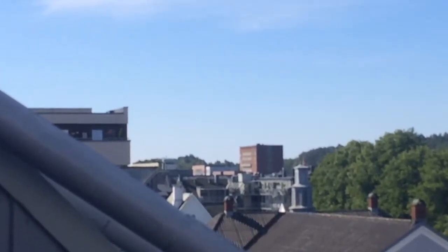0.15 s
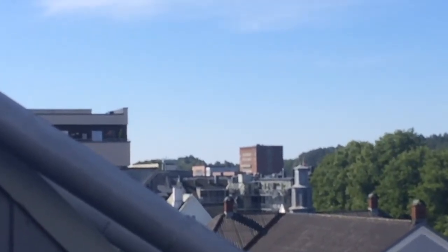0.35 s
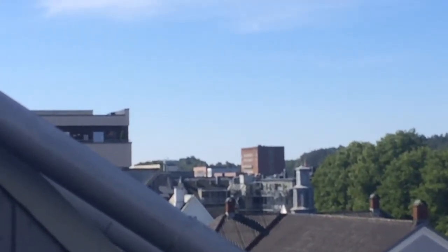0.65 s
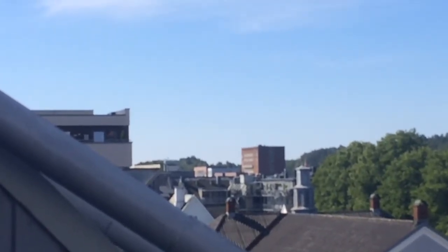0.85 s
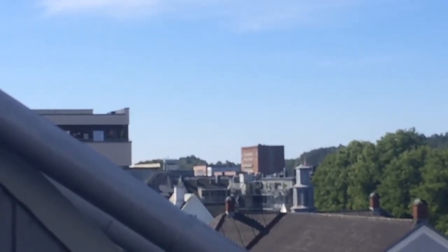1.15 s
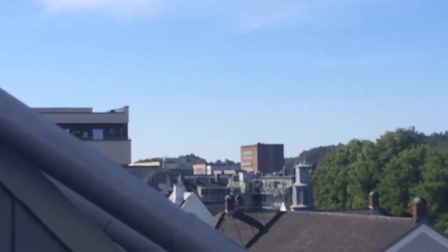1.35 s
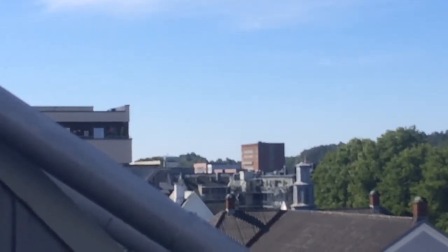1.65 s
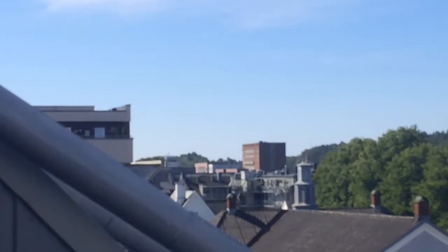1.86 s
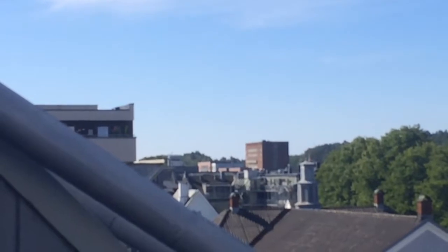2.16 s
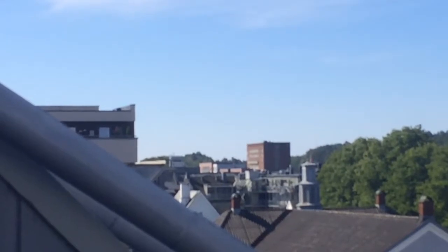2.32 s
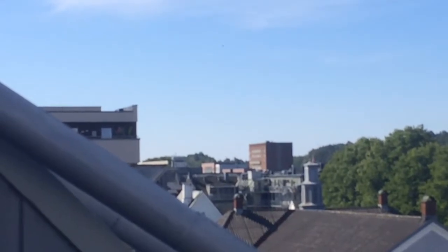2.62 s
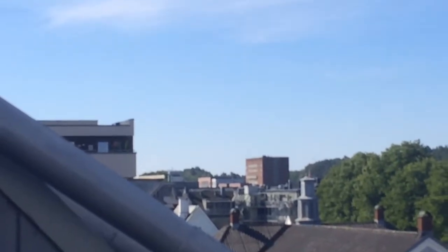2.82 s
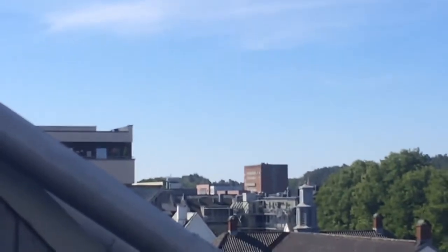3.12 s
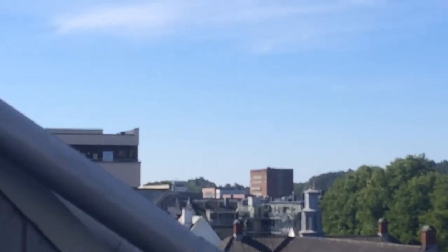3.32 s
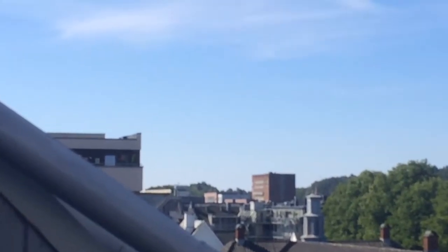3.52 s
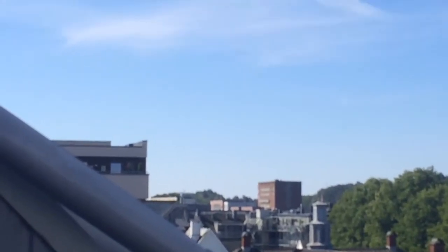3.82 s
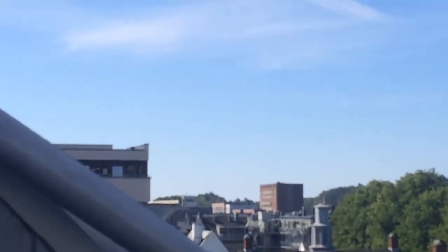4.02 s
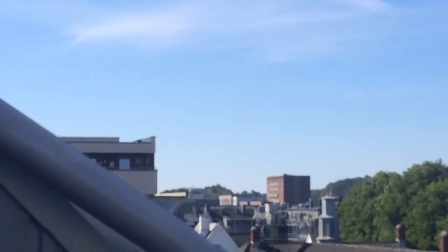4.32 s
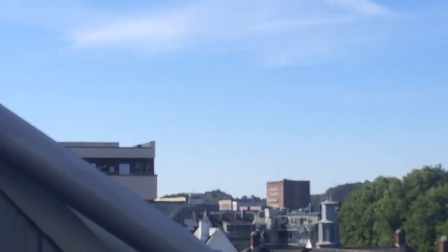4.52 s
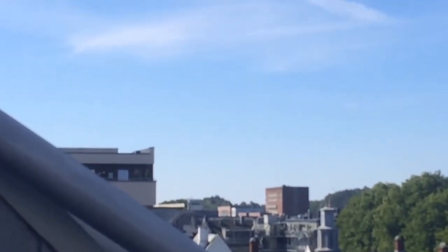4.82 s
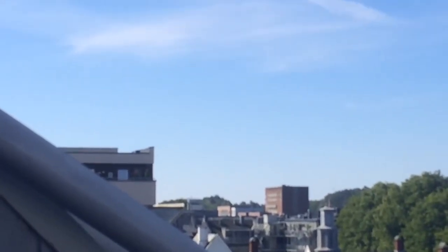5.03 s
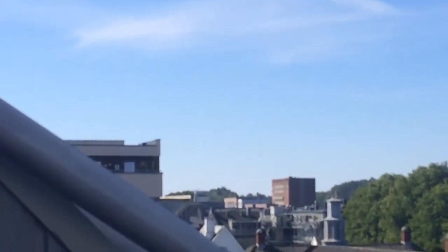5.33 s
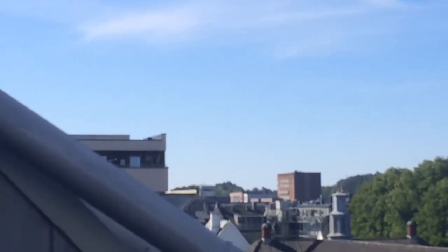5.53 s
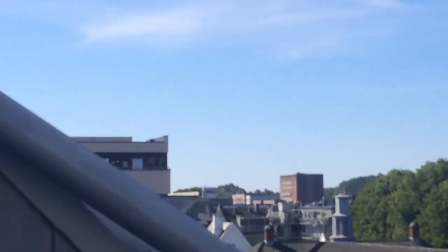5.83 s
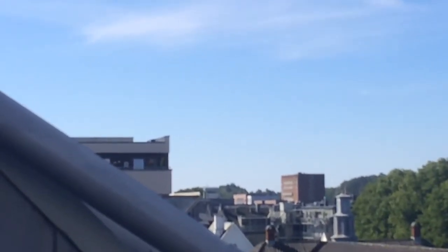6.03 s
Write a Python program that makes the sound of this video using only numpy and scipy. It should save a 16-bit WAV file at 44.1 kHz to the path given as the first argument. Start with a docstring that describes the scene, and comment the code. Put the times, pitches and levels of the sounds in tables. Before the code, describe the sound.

From an open rooftop, a distant helicopter approaches, blades thumping about eighteen times a second over a low drone and buzzing tail rotor. Its airy rush and hollow roar steadily grow. Around three seconds the hand-held microphone is bumped, with clicks, creaks, a rough scuff and a tiny scrape. Then the helicopter is close, with irregular hard blade slaps. Faint distant traffic and steady hiss lie underneath.

```python
"""Low helicopter over a town

From a rooftop, with a hand-held camera's microphone, a helicopter comes in low. Its main rotor, pulses
and wake-cutting pops, thumps and slaps about 18 times a second over a tail rotor's stack of partials,
two low tones and a growing rush of shaped noise. Far traffic and microphone hiss are one steady noise.
Half way through, the camera shifts in the hand: short knocks, noise scuffs, a scrape; its case creaks."""
import sys
import numpy as np
from scipy import signal
from scipy.fft import rfft, irfft, next_fast_len
from scipy.io import wavfile

SR = 44100
rng = np.random.default_rng(int(sys.argv[2]) if len(sys.argv) > 2 else 0)


def store_pcm(level_fs):
    """Save levels as 16-bit WAV."""
    pcm = np.round(np.clip(level_fs, -1, 1) * 32767).astype(np.int16)
    wavfile.write(sys.argv[1], SR, np.atleast_2d(pcm).T)


N = 272097
TIME = np.arange(N) / SR  # seconds

# main rotor swelling as it comes in: time_s, thump_db (rms), pop_db (peak)
MAIN_ROTOR_LEVEL = [(0, -52, -58), (.75, -49.5, -54), (1.3, -45, -40.5), (2, -40.5, -43), (3.4, -43, -37),
                    (4, -41.5, -39), (4.7, -39.5, -35), (5.5, -45, -39.5), (6.17, -44, -37)]


def amp(db):
    """Decibels to gain."""
    return 10 ** (np.asarray(db) / 20)


def unit(x):
    """Scales to an rms of 1."""
    return x / np.sqrt(np.mean(x ** 2) + 1e-20)


def follow(rows):
    """Each column of a curve, drawn in straight lines sample by sample."""
    time_s, *columns = np.transpose(rows)
    return [np.interp(TIME, time_s, column) for column in columns]


def gains(points, hz):
    """Gain of a spectrum at the given frequencies, in dB straight over log frequency."""
    point_hz, point_db = np.transpose(points)
    return amp(np.interp(np.log(hz + 1), np.log(point_hz), point_db))


def colour(x, points, size=4096):
    """Causal minimum-phase filter with the given spectral shape and unit energy."""
    log_gain = np.log(gains(points, abs(np.fft.fftfreq(size, 1 / SR))))
    response = np.exp(np.conj(signal.hilbert(log_gain)))
    taps = np.fft.ifft(response).real
    return signal.oaconvolve(x, taps / np.linalg.norm(taps))[:len(x)]


def drift(hz):
    """Random wander of rms 1, changing up to about hz times a second."""
    size = next_fast_len(N)
    f = np.fft.rfftfreq(size, 1 / SR)
    lowpass = np.exp(-(f / hz) ** 2) * (f > 0)
    return unit(irfft(rfft(rng.standard_normal(size)) * lowpass, size)[:N])


def narrow_noise(hz, spread_hz):
    """Noise of about rms 1 gathered around a steady or gliding frequency."""
    angle = 2 * np.pi * np.cumsum(hz * np.ones(N)) / SR
    return drift(spread_hz) * np.cos(angle) + drift(spread_hz) * np.sin(angle)


def add(mix, start_s, sound):
    """Mixes a sound in from its start time."""
    part = mix[round(start_s * SR):][:len(sound)]
    part += sound[:len(part)]


def burst(spectrum, length_s, rise_s=0.0013, size=4096):
    """A quickly dying puff of coloured noise with a peak of 1."""
    t = np.arange(size) / SR
    envelope = (1 - np.exp(-t / rise_s)) * np.exp(-(t / length_s) ** 2)
    puff = colour(rng.standard_normal(size) * envelope, spectrum)
    return puff / abs(puff).max()


def wavelet(peak_db, hz, width_s):
    """A few swings of pressure, deepest in the middle of the 40 ms that they fill."""
    t = np.arange(-.02, .02, 1 / SR)
    return -amp(peak_db) * np.cos(2 * np.pi * hz * t) * np.exp(-(t / width_s) ** 2 / 2)


def pops(rows):
    """Wavelets centred on their times, from rows of centre_s, peak_db, pitch_hz, half_width_s."""
    out = np.zeros(N)
    for centre_s, *shape in rows:
        sound = wavelet(*shape)
        add(out, max(centre_s - len(sound) / SR / 2, 0), sound)
    return out


def blade_rate():
    """Blades passing per second, slower as the Doppler shift wanes."""
    # main rotor's blade passages: time_s, rate_hz
    rate_curve = [(0, 18.48), (1.5, 18.47), (3, 18.16), (4.5, 17.85), (6.17, 17.46)]
    return follow(rate_curve)[0]


def blade_turns():
    """Count of blades gone by, the running sum of their rate."""
    return np.cumsum(blade_rate()) / SR


def approach():
    """Level of the air noise gained by coming nearer, in dB relative to the nearest point."""
    # coming in from a distance: time_s, level_db
    approach_curve = [(0, -13.5), (.6, -15), (2, -11), (3.6, -3.5), (4.6, -0.5), (5.7, 0), (6.17, -0.5)]
    return follow(approach_curve)[0]


def main_rotor(turns, lag=0.1163, echo_db=-2.5, flutter_db=1.5):
    """Each blade sends a pressure pulse and a wall repeats it; turbulent air makes the harmonics flutter."""
    # one blade's pressure pulse: multiple of the blade rate, level_db
    thump_harmonics = [(1, -24), (2, -1.5), (3, -5.5), (4, -4), (5, -8.5), (6, -19.5), (7, -11.5), (9, -13),
                       (10, -19.5), (11, -24)]
    # wall's repeat of each pulse: time_s, echo_delay_s
    wall_echo = [(0, 0.02), (1.5, .017), (3.5, 0.017), (5, .016), (6.17, 0.02)]
    apart = follow(wall_echo)[0] * blade_rate()  # echo delay in blade passages
    direct = turns - lag + apart / 2
    echo = turns - lag - apart / 2
    pulses = 0
    for k, db in thump_harmonics:
        angle = 2 * np.pi * k
        pair = np.cos(angle * direct) + amp(echo_db) * np.cos(angle * echo)
        pulses += amp(db + flutter_db * drift(5.0)) * pair
    thump_db, _ = follow(MAIN_ROTOR_LEVEL)
    return amp(thump_db) * unit(pulses)


def blade_pops(turns, lag=0.031, width_s=0.0022, uneven_db=0.5, detune=0.11, jitter_s=0.0007):
    """Every blade cuts the wake of the one before, with chance in its force, pitch and timing."""
    start_hz, deepening = 464, 3.5  # pitch falls as this power of the blade rate
    times = np.interp(np.arange(1, int(turns[-1])) + lag, turns, TIME)
    force, pitch, late = rng.standard_normal((len(times), 3)).T
    rate = blade_rate()
    pitch_hz = np.interp(times, TIME, start_hz * (rate / rate[0]) ** deepening)
    _, pop_db = follow(MAIN_ROTOR_LEVEL)
    peak_db = np.interp(times, TIME, pop_db) + uneven_db * np.minimum(force, 1)
    widths = np.full(len(times), width_s)
    return pops(zip(times + jitter_s * late, peak_db, pitch_hz * np.exp(detune * pitch), widths))


def tail_rotor(turns, waver=0.023, shimmer=0.028, flutter_db=4.0):
    """A buzzing stack whose upper partials smear and fade in and out on their way through the air."""
    # buzz of the tail blades: multiple of their passing rate, level_db
    tail_partials = [(1, 3.5), (2, -19.5), (3, -32), (4, -17.5), (5, -26), (6, -26.5), (7, -29)]
    # fading in and out through the air: time_s, level_db
    tail_level = [(0, -50), (.5, -49), (.9, -43.5), (1.8, -44.5), (2.55, -47.5), (3.1, -41.5), (3.4, -47.5),
                  (3.8, -50.5), (4.2, -40), (4.65, -38.5), (5.35, -49.5), (5.65, -40.5), (6.17, -45.5)]
    phase = 7.35 * turns + waver * drift(3)  # tail blades per main blade
    smear = shimmer * drift(27)
    stack = 0
    for k, db in tail_partials:
        partial = np.cos(2 * np.pi * (k * phase + (k - 1) * smear + rng.random()))
        stack += amp(db + flutter_db * np.log(k) * drift(9.6)) * partial
    return amp(follow(tail_level)[0]) * unit(stack)


def drone(turns, flutter_db=1.0):
    """Two low tones that settle in level and sink with the same Doppler shift."""
    # drone's partials: start_hz, level_db
    drone_lines = [(104, 0), (206.5, -5.5)]
    settled_db, early_db, settle_s = -54.5, 5.5, 0.94  # starts early_db above its settled level
    clock = turns / blade_rate()[0]  # seconds, stretched by the Doppler shift
    waver = .07 * drift(4)
    tones = 0
    for hz, db in drone_lines:
        tones += amp(db + flutter_db * drift(19.0)) * np.cos(2 * np.pi * (hz * clock + waver))
    level_db = settled_db + early_db * np.exp(-(TIME / settle_s) ** 2)
    return amp(level_db) * np.sqrt(2) * tones


def chop(turns, lag, rise, fall, uneven_db):
    """A swell at each blade passage, quick to rise and slower to fall (in turns), each of its own strength."""
    cycle = turns - lag + .25  # a quarter passage early, to hold the rise
    since = cycle % 1 - .25
    blade_db = uneven_db * np.clip(rng.standard_normal(200), -2, 2)
    strength = amp(blade_db)[np.floor(cycle).astype(int)]
    return unit(strength * np.exp(-np.maximum(-since / rise, since / fall)))


def rotor_air(turns, throb_db=-1, swish_db=-6.0, bright_swish_db=-9, gust_db=2.14, gust_hz=3):
    """Rush of the wake and exhaust, growing with the approach; each blade adds a low throb and a swish."""
    # spectral shapes of the low, middle and bright air: frequency_hz, density_db
    rumble_spectrum = [(15, -11), (30, -22), (55, 6.5), (85, 2), (120, 4), (170, 3), (210, 3), (250, -9),
                       (330, -8.5), (600, -75.5)]
    rush_spectrum = [(150, -48.5), (250, -1.5), (320, 0), (480, 1.5), (600, -7), (740, -4), (900, -7),
                     (1100, -16.5), (1500, -21.5), (3000, -67.5)]
    bright_spectrum = [(600, -28.5), (1000, 1.5), (1250, 2.5), (1600, 3.5), (2000, -3.5), (2500, -8.5),
                       (3300, -17.5), (4200, -24), (6000, -39.5), (9000, -64)]
    near_db = approach()
    throb = chop(turns, lag=-0.11, rise=0.047, fall=0.16, uneven_db=0.5)
    swish = chop(turns, lag=0.036, rise=0.063, fall=0.21, uneven_db=1.0)
    low, body, top, low_throb, body_swish, top_swish = rng.standard_normal((6, N))
    low += amp(throb_db) * throb * low_throb
    body += amp(swish_db) * swish * body_swish
    top += amp(bright_swish_db) * swish * top_swish
    # steady part's level at the nearest point, dB gained per dB of approach, then random wander
    rumble_db = -45 + 0.7 * near_db + gust_db * drift(gust_hz)
    rush_db = -44.5 + 0.96 * near_db + .5 * drift(23)
    bright_db = -56 + 0.63 * near_db + .5 * drift(6.3)
    rumble = amp(rumble_db) * colour(low, rumble_spectrum)
    rush = amp(rush_db) * colour(body, rush_spectrum)
    bright = amp(bright_db) * colour(top, bright_spectrum)
    return rumble + rush + bright


def exhaust():
    """The exhaust's hollow roar, narrow low noise that comes out as the helicopter nears."""
    level_db = -47 + 1.3 * approach()
    return amp(level_db) * narrow_noise(185.3, spread_hz=40)


def town_and_hiss(level_db=-58):
    """Far traffic wash under the microphone's own faint, steady hiss, as one shaped noise."""
    # spectral shape of the far town and the microphone's faint hiss: frequency_hz, density_db
    background_spectrum = [(20, -17), (60, -27.5), (200, -1.5), (330, -25.5), (700, -1), (1000, -1.5),
                           (1500, -16), (2200, -26.5), (2750, -28.5), (3300, -23.5), (4300, -30.5),
                           (6000, -32.5), (8500, -36), (10500, -37), (11250, -30), (12000, -38.5),
                           (15000, -38)]
    return amp(level_db) * colour(rng.standard_normal(N), background_spectrum)


def case_ring(ring_db=-81, ring_hz=3300, ring_spread_hz=220):
    """The case rings faintly in the grip, a narrow noise of wavering level."""
    return amp(ring_db + 3.6 * drift(28)) * narrow_noise(ring_hz, ring_spread_hz)


def creaks():
    """Tiny slips of the case as noise puffs: louder ones at set times, faint ones by chance."""
    # the louder creaks, close at the microphone: start_s, peak_db, length_s
    loud_creaks = [(0.372, -53.5, .004), (.487, -52, 0.0034), (1.049, -49.5, 0.0025), (1.148, -50, .0045),
                   (1.668, -53, 0.0033), (2.25, -44, 0.0042), (2.607, -48.5, 0.0041), (2.752, -49.5, .005),
                   (2.798, -47, 0.0052), (2.888, -45, .004), (2.907, -40, 0.0054), (2.931, -40, 0.0072),
                   (3.105, -50, 0.015), (3.261, -39, 0.0013), (3.272, -33, 0.0025), (3.284, -38, 0.0079),
                   (3.371, -43, 0.0014), (3.384, -45, .0074), (3.399, -38, 0.0039), (3.437, -45, 0.0065),
                   (3.769, -40.5, 0.0049), (3.941, -48, .0035), (4.627, -50, .0073)]
    # spectral shape of the case: frequency_hz, density_db
    case_spectrum = [(500, -30), (2100, -15.5), (2700, -7), (3300, 0.5), (4300, -16), (5800, -17),
                     (7500, -24.5), (9500, -32), (13000, -29), (16000, -47)]
    rise_s = 0.00067
    ticks_per_s, tick_db, tick_spread_db, tick_length_s = 2.5, -55.5, 3.5, 0.0043
    out = np.zeros(N)
    for start_s, peak_db, length_s in loud_creaks:
        add(out, start_s, amp(peak_db) * burst(case_spectrum, length_s, rise_s))
    # one faint creak somewhere in each time slot
    for slot_s in np.arange(0, TIME[-1], 1 / ticks_per_s):
        start_s = slot_s + rng.random() / ticks_per_s
        peak_db = tick_db + tick_spread_db * rng.standard_normal()
        add(out, start_s, amp(peak_db) * burst(case_spectrum, tick_length_s, rise_s))
    return out


def hard_slaps(width_s=0.0018, hiss_length_s=.0075, lead_s=0.003095):
    """Blades that strike a tip vortex hard: each a loud hollow pop inside a puff of hiss."""
    # slaps as they reach the microphone: centre_s, pop_peak_db, pitch_hz, hiss_peak_db
    slap_rows = [(1.1424, -45, 570, -49), (1.2985, -44, 485, -50), (1.8427, -46, 650, -55),
                 (2.0617, -37, 507, -49), (3.0999, -43, 446, -65), (3.7673, -33, 466, -42),
                 (4.4363, -26, 423, -35.5), (4.547, -23.5, 448, -35), (4.6058, -35, 252, -35),
                 (4.6581, -35, 394, -34.5), (4.715, -38, 486, -35), (5.1655, -26, 195, -44),
                 (5.2783, -26.5, 343, -41.5), (5.508, -31, 333, -45), (5.561, -26, 363, -56),
                 (5.6784, -33, 695, -45), (5.787, -30, 316, -46), (5.8495, -27, 194, -42)]
    # spectral shape of their hiss: frequency_hz, density_db
    hiss_spectrum = [(300, -4), (600, -12), (850, 12.5), (1200, -13), (1650, -3), (2000, -11.5),
                     (2500, -10), (3200, -26.5), (5000, -43), (9000, -82)]
    out = pops([(centre_s, db, hz, width_s) for centre_s, db, hz, _ in slap_rows])
    for centre_s, *_, hiss_db in slap_rows:
        add(out, centre_s - lead_s, amp(hiss_db) * burst(hiss_spectrum, hiss_length_s))
    return out


def knocks_and_slap():
    """Knocks on the camera, and one duller blade slap at 3.4363 s, each a very short swing of pressure."""
    # knocks on the camera, the last row the blade slap: centre_s, peak_db, pitch_hz, half_width_s
    knock_rows = [(2.8029, -20, 626, 0.00031), (2.8765, -29, 800, 0.00032), (2.8868, -14, 705, 0.00027),
                  (3.3601, -28, 432, 0.0032), (3.4363, -31.5, 430, 0.0033)]
    return pops(knock_rows)


def scuffs(rough_db=2, rough_hz=150, squeak_spread_hz=550):
    """The hand slides in short strokes of rough noise; a fingertip's falling scrape ends the last."""
    # strokes of the hand on the case: peak_s, level_db, rise_s, fall_s
    stroke_rows = [(3.22, -47, 0.0074, 0.032), (3.356, -35.5, 0.0038, 0.011), (3.465, -40, 0.071, .011)]
    # spectral shape of skin on the case: frequency_hz, density_db
    scuff_spectrum = [(150, -22), (400, 13), (650, 4), (1000, -4), (1600, -6.5), (2600, -15), (3500, -24),
                      (7000, -35), (14000, -67)]
    strokes = 0
    for peak_s, db, rise_s, fall_s in stroke_rows:
        strokes += amp(db) * np.exp(-np.maximum((peak_s - TIME) / rise_s, (TIME - peak_s) / fall_s))
    roughness = amp(rough_db * drift(rough_hz))
    slide = strokes * roughness * colour(rng.standard_normal(N), scuff_spectrum)
    middle_s, half_length_s, level_db = 3.468, 0.015, -49.5
    middle_hz, fall_hz_per_s = 2445, 45000
    since = TIME - middle_s
    scrape = narrow_noise(middle_hz - fall_hz_per_s * since, squeak_spread_hz)
    return slide + amp(level_db) * np.exp(-(since / half_length_s) ** 2) * scrape


def scene():
    """Helicopter, town and handling at one microphone."""
    turns = blade_turns()
    rotor = main_rotor(turns) + blade_pops(turns) + hard_slaps()
    tones = tail_rotor(turns) + drone(turns)
    air = rotor_air(turns) + exhaust()
    close = case_ring() + creaks() + knocks_and_slap() + scuffs()
    return (rotor + tones + air + town_and_hiss() + close)[None]


def record(dry):
    """The recorder's band limit, a steep low-pass."""
    edge_hz = 15300
    taps = signal.firwin(1601, edge_hz, window=("kaiser", 9), fs=SR)
    return signal.oaconvolve(dry, taps[None], "same")


dry = scene()
out = record(dry)
store_pcm(out)
```